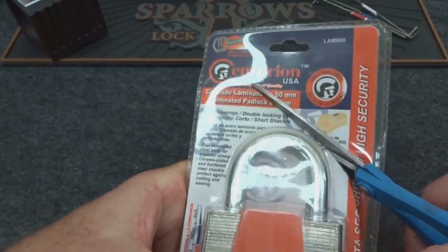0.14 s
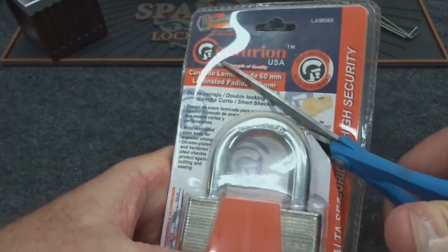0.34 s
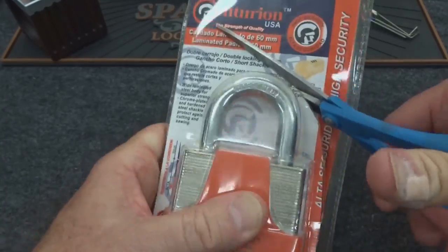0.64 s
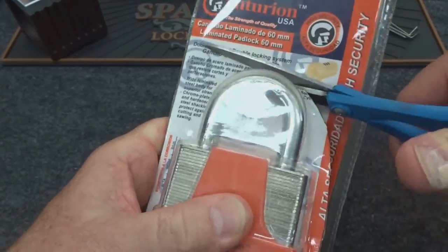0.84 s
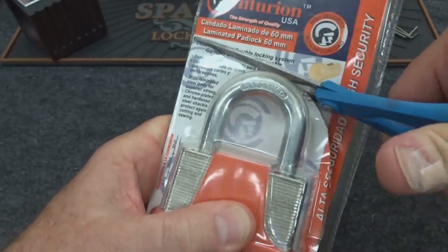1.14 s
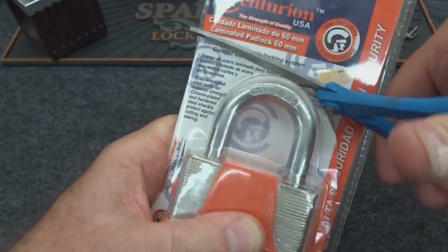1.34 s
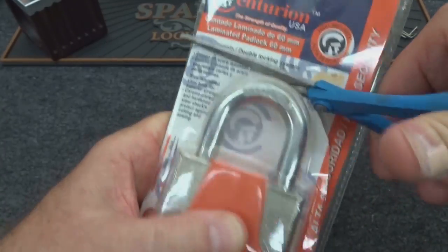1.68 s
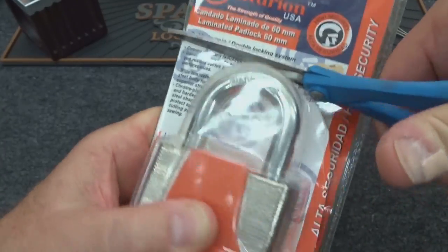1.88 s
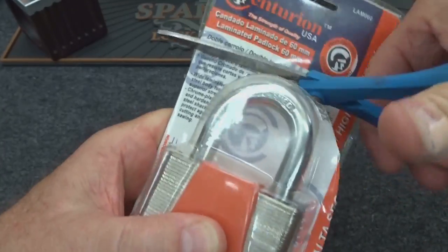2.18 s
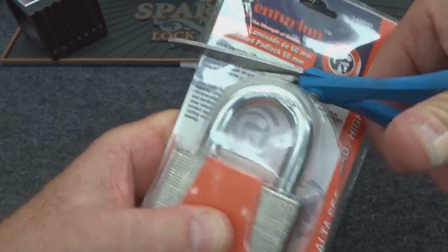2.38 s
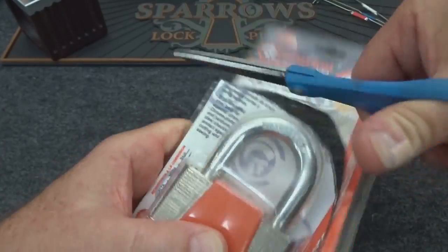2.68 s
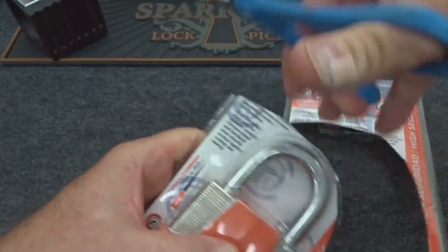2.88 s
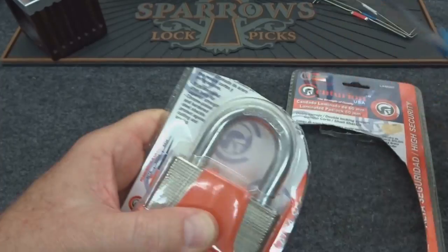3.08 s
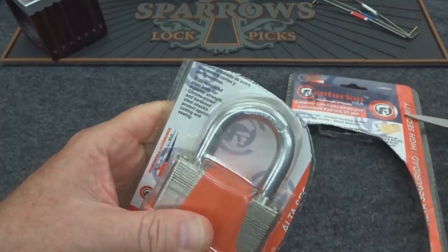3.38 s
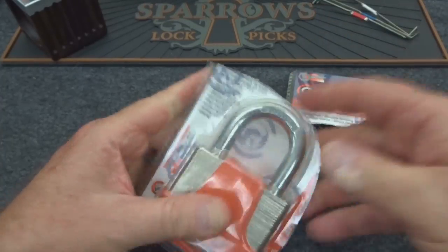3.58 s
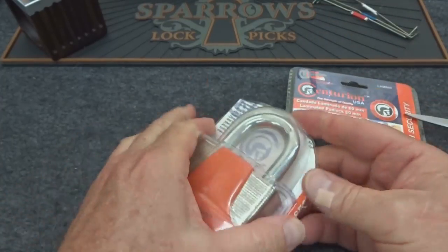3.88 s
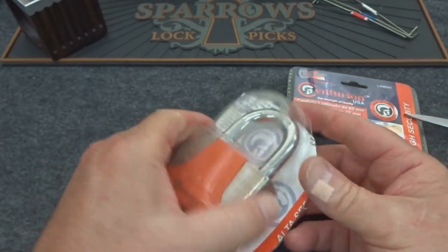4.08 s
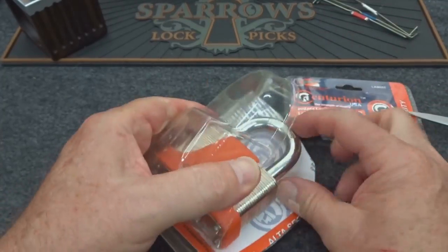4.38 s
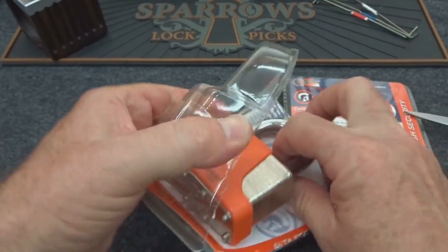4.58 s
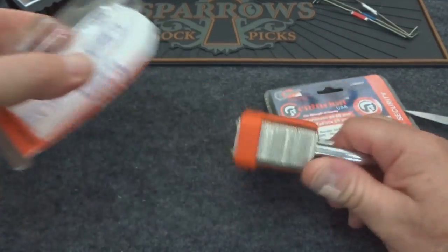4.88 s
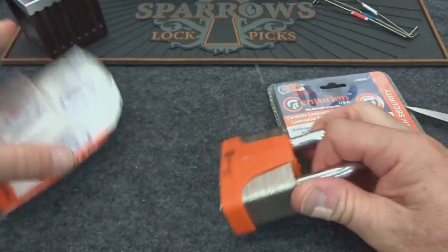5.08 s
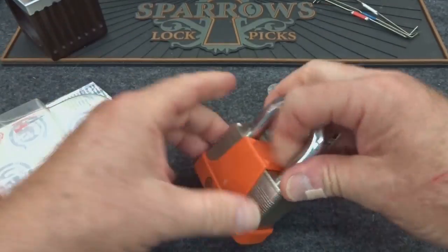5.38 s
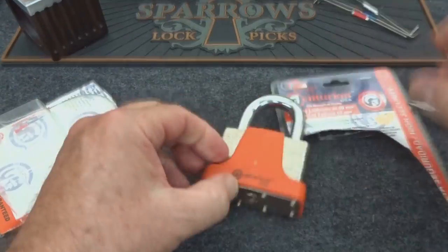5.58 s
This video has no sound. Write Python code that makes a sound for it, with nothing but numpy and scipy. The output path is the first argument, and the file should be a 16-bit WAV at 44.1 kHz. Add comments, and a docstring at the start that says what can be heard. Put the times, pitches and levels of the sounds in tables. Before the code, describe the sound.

A close, dry sound of stiff plastic packaging being cut in a small quiet room. From 0 to 1.8 s, scissors work in uneven bites: bright snaps around 0.1, 0.3, 0.8 and 1.5 s, with scratchy, crinkling rustle swelling and dying between them. A very loud, hard crack bursts at 1.9 s. After a lighter stretch with small snaps, crackling intensifies at 2.6 to 2.8 s as the shell is cut through, with a hollow low pop of card backing near 2.7 s and faint steel ticks. At 3.25 s the scissors land with a short bright metallic clack and soft thud. Quieter handling follows, with a rustle at 3.6 s and gentle crinkles to 4.7 s, then a cluster of small cracks around 4.8 to 5 s and a light bump near 5.2 s. At 5.6 s a heavy padlock hits the padded table with a deep, blunt thump and plastic snaps. Faint low room tone underneath.

```python
"""In a small room, scissors work through a stiff plastic blister pack close to a microphone.
Stick-slip friction rustles as the shell is squeezed; folds give way in cracks that ring its modes.
The card backing pops, scissors, card and a padlock land on a padded table, and the steel blades knock.
The sounds are bursts of force driving damped resonators, over faint room tone and a short diffuse tail."""
import sys
import numpy as np
from scipy import signal
from scipy.fft import rfft, irfft
from scipy.io import wavfile
from scipy.ndimage import uniform_filter1d

SR = 44100
rng = np.random.default_rng(int(sys.argv[2]) if len(sys.argv) > 2 else 0)


def waveform_to_disk(signal):
    """Save audio, clipped to [-1, 1], as 16-bit WAV at the path in sys.argv[1]."""
    frames = np.transpose(np.atleast_2d(signal))
    scaled = np.clip(frames, -1, 1) * 32767
    samples = np.round(scaled).astype(np.int16)
    wavfile.write(sys.argv[1], SR, samples)


N = 252693


def undb(db):
    """Logarithmic level: decibels to amplitude gain."""
    return 10 ** (np.asarray(db) / 20)


def fade(t, t60):
    """Exponential decay: falls 60 dB in t60 seconds."""
    return np.exp(-np.log(1000) * t / t60)


def ring(force, modes, gains, bend=1):
    """Modal superposition: the force drives damped resonators, whose pitches are multiplied by bend."""
    out = 0
    for (hz, db, t60), gain, factor in zip(modes, gains, bend * np.ones(len(modes))):
        radius = fade(1 / SR, t60)
        angle = 2 * np.pi * hz * factor / SR
        poles = [1, -2 * radius * np.cos(angle), radius * radius]
        out = out + gain * undb(db) * signal.lfilter([np.sin(angle)], poles, force)
    return out


def bands(force, peaks, shift_db=0):
    """Broad resonance: heavily damped bands (Hz, width Hz, dB), each raised by shift_db, summed."""
    out = 0
    for k, ((hz, width, db), more) in enumerate(zip(peaks, shift_db + np.zeros(len(peaks)))):
        band = signal.lfilter(*signal.iirpeak(hz, hz / width, fs=SR), force)
        out = out + (-1) ** k * undb(db + more) * band  # neighbours have opposite signs
    return out


def unit(x):
    """Effective value: scale to rms 1."""
    return x / np.sqrt(np.mean(x ** 2))


def peak(x, db):
    """Peak level: scale the largest excursion to db."""
    return x * undb(db) / np.max(np.abs(x))


def add(out, s, x):
    """Linear superposition: mix x into out at time s."""
    i = max(int(s * SR), 0)
    out[i:i + len(x)] += x[:N - i]


def slips(shape, rate, spread_db):
    """Stick-slip friction: random clicks of both signs, rate per second, a few much larger than the rest."""
    hit = rng.random(shape) < rate / SR
    size = np.minimum(rng.exponential(size=shape), 3)
    return hit * rng.standard_normal(shape) * undb(spread_db * size)


def wander(hold):
    """Slow random modulation: levels held for hold samples and slewed from one to the next."""
    steps = np.repeat(rng.standard_normal(N // hold + 1), hold)
    return uniform_filter1d(steps, hold)[:N]


# Spectrum of the room tone. Each row: frequency in Hz, relative level in dB per Hz.
AIR_SPECTRUM = [(21, -22), (35, 7.5), (85, -14), (152, -14), (310, -23), (698, -34), (772, -34.5),
                (1050, -29.5), (1350, -34), (3000, -42.5), (15000, -52)]
AIR_DB = -55.5  # rms level


def air():
    """Spectral shaping of noise: faint room tone, strongest in the bass."""
    hz = np.fft.rfftfreq(N, 1 / SR) + 1  # the offset avoids log(0)
    corner_hz, corner_db = np.array(AIR_SPECTRUM).T
    shape = undb(np.interp(np.log(hz), np.log(corner_hz), corner_db))
    return unit(irfft(rfft(rng.standard_normal(N)) * shape, N)) * undb(AIR_DB)


# Squeezes and scrapes of the pack, each swelling and dying away. Each row: peak time in seconds,
# rustle level in dB, treble in dB over rustle, bass in dB over rustle, pitch in Hz,
# swell in ms per 20 dB, fall in ms per 20 dB, treble tilt in dB from 4 to 13 kHz.
SQUEEZES_OF_PACK = [(0.0, -38.5, -7, -8, 1600, 50, 265, -25), (0.303, -34.5, -10, -7.5, 1480, 150, 240, -6),
                    (0.719, -43.5, -9, -8.5, 1420, 221, 250, -5),
                    (0.818, -32.5, -5.5, -7.5, 1590, 22, 120, -16),
                    (0.9, -47, -28, -18, 1490, 100, 318, -19), (1.153, -38, -11, -8, 1390, 243, 158, -15),
                    (1.339, -42.5, -10, -4.5, 1460, 80, 231, -7),
                    (1.479, -38, -11.5, -20, 1440, 102, 262, -12),
                    (1.702, -40.5, -9.5, -7, 1370, 58, 148.5, -2.5),
                    (1.914, -28, -11, -16, 1520, 82, 215, -19), (2.273, -43, -8, -9, 1580, 181, 230, -2),
                    (2.457, -32, -8, -6.5, 1430, 30, 84, 5), (2.621, -28, -3.5, -25, 2300, 22, 108, 3),
                    (2.696, -26.5, -9, -3.5, 2250, 66, 110, -6), (2.781, -31.5, -6, -8.5, 2600, 96, 134, 0),
                    (2.96, -39.5, -9, -30, 2850, 404, 29, -6), (3.0, -54.5, -7, -4.5, 2150, 63, 299, -9),
                    (3.311, -43.5, -3.5, -5.5, 1880, 63, 121, 1),
                    (3.631, -32.5, -9.5, -8, 1337, 23.5, 126, -10),
                    (3.863, -42.5, -14.5, -11.5, 1250, 96.5, 111, -5.5),
                    (4.035, -51.5, -12.5, -5.5, 1890, 62, 202, -3),
                    (4.149, -38.5, -12.5, -9, 1415, 70, 54, -4.5),
                    (4.26, -49, -7, -10, 1330, 157, 116, -4.5),
                    (4.414, -56.5, -12.5, -17, 1170, 135, 500, -2.5),
                    (4.455, -66, 3.5, -16, 1410, 35.5, 36, 2.5), (4.557, -45.5, -15, -29, 1360, 57, 602, 0),
                    (4.847, -40, -7.5, -10, 1680, 295, 156, 10), (4.917, -44, -9.5, -25, 1530, 100, 90, -6),
                    (5.04, -48.5, -12, -22, 1100, 150, 252, -9), (5.172, -47, -16, -4.5, 998, 65, 282, -11),
                    (5.529, -65.5, 7, -0.5, 1630, 148, 147, -2),
                    (5.602, -30.5, -7.5, -24, 1640, 17, 122, -8)]


def handling():
    """Power addition: squeezes sum in rustle, treble and bass; the louder weigh more in pitch and tilt."""
    s, db, treble_db, bass_db, hz, swell_ms, fall_ms, tilt_db = np.transpose(SQUEEZES_OF_PACK)[:, :, None]
    grid = np.arange(0, N + 64, 64)  # in samples
    ms = (grid / SR - s) * 1000
    power = undb(db + 20 * np.where(ms < 0, ms / swell_ms, -ms / fall_ms)) ** 2
    levels = [10 * np.log10((power * undb(more) ** 2).sum(axis=0)) for more in (0, treble_db, bass_db)]
    means = [(power * c).sum(axis=0) / power.sum(axis=0) for c in (hz, tilt_db)]
    return [np.interp(np.arange(N), grid, c) for c in levels + means]


# Modes of the plastic shell. Each row: frequency in Hz, relative level in dB, decay time t60 in seconds.
SHELL_MODES = [(683, -7.5, 0.018), (820, -7.5, 0.025), (997, -9.5, 0.013), (1170, -7.5, 0.0094),
               (1360, -6.5, 0.012), (1530, 0, 0.01), (1815, -4.5, 0.0079), (2014, 1, 0.011),
               (2286, 2.5, 0.0083), (2564, 0, 0.025), (2800, 5.5, 0.0082), (3454, -6.5, 0.016)]
# Treble colour of the shell. Each row: centre in Hz, width in Hz, relative level in dB.
SHELL_TREBLE = [(3940, 1620, 1), (4300, 3180, 3.5), (5860, 2130, 3.5), (7560, 2140, -4), (8550, 1400, -2.5),
                (10100, 2600, -10), (12700, 3600, -10.5)]


def rustle():
    """Stick-slip excitation of modes: dense slips of fingers and blades on the shell, fluttering in strength."""
    body_db, treble_db, bass_db, pitch_hz, tilt_db = handling()
    flutter = undb(2.8 * wander(256))
    grain = slips(N, 12000, 0.88) + 3.0 * slips(N, 600, 3.4)  # dense grain plus lone ticks
    force = grain * flutter

    body, body_power = 0, 0
    for k, mode in enumerate(SHELL_MODES):
        # the grip decides which modes are free to ring
        free = np.exp(-(np.log(mode[0] / pitch_hz) / 0.42) ** 2)
        free = free + 0.23 * np.minimum(pitch_hz / mode[0], 1) ** 0.6
        free = free * undb(3.5 * wander(2048))  # and they come and go as the shell bends
        body = body + (-1) ** k * free * unit(ring(force, [mode], [1]))
        body_power = body_power + free ** 2

    treble, treble_power = 0, 0
    for k, (centre, width, db) in enumerate(SHELL_TREBLE):
        tilt = tilt_db * k / (len(SHELL_TREBLE) - 1)
        free = np.sqrt(width) * undb(db + tilt + 2.7 * wander(2048))  # each region comes and goes
        own = np.roll(grain, (k + 1) * N // 8) * flutter  # shifted in time, so regions tick separately
        treble = treble + free * unit(bands(own, [(centre, width, 0)]))
        treble_power = treble_power + free ** 2

    bass = unit(bands(bands(force, [(276, 610, 0)]), [(280, 670, 0)]))
    out = body / np.sqrt(body_power) * undb(body_db)
    out = out + treble / np.sqrt(treble_power) * undb(treble_db)
    return out + bass * undb(bass_db)


# Cracks of the shell, with levels before the bass cut. Each row: start in seconds, ring peak in dB,
# ring pitch in Hz, treble peak in dB, nominal length in ms (at least 1 is used).
SHELL_CRACKS = [(0.042, -38, 1550, -45, 4.6), (0.054, -16, 1610, -15.5, 4.1), (0.077, -30.5, 1220, -47, 3),
                (0.098, -9, 1242, -19, 2.2), (0.103, -19, 1430, -23.5, 13.7), (0.231, -37, 820, -34, 2.7),
                (0.247, -35, 1500, -33, 2.7), (0.279, -33, 1040, -30, 3.5), (0.294, -10, 1415, -6.5, 0.73),
                (0.297, -26, 1070, -23.5, 26), (0.359, -26.5, 1460, -31, 3.7),
                (0.385, -24.5, 1020, -23, 14), (0.462, -31, 1170, -24.5, 4.6), (0.482, -38, 674, -37, 17),
                (0.579, -69, 2240, -40.5, 3.9), (0.69, -27, 1270, -38, 1.1), (0.707, -24, 1410, -31, 2.9),
                (0.718, -37, 1580, -12, 3.6), (0.808, -8, 1490, -8.5, 15.7), (0.852, -19, 1530, -25, 28),
                (0.869, -11.5, 1520, -22.5, 10.5), (0.871, -10, 1520, -21, 9.6),
                (0.891, -34, 1590, -34, 42), (0.918, -29.5, 1360, -36, 6.9), (1.042, -8.5, 1570, -25, 4.8),
                (1.115, -27, 656, -54, 4.4), (1.134, -23.5, 775, -54, 3.5), (1.145, -20, 1600, -17, 5),
                (1.153, -21.5, 1390, -17, 8), (1.217, -31.5, 1930, -26.5, 5.5),
                (1.225, -36.5, 600, -26, 14.4), (1.334, -29, 1540, -53, 11), (1.461, -10.5, 1440, -9, 1.6),
                (1.494, -29, 815, -27, 3.4), (1.53, -15.5, 1670, -26, 5.9), (1.664, -33, 1690, -34.5, 7.4),
                (1.681, -30, 1600, -24.5, 2.6), (1.689, -26.5, 950, -36, 2.5), (1.696, -20, 1470, -36, 2.5),
                (1.705, -29, 1500, -35, 2.5), (1.797, -44, 1500, -41, 3), (1.819, -27.5, 1360, -39, 7.5),
                (1.852, -19, 1560, -22, 2.3), (1.864, -11, 1620, -4, 1.7), (1.88, -14, 1510, -9, 1.2),
                (1.896, 3, 1673, -6, 3.9), (1.903, -12, 1690, -8.5, 25), (1.921, -37, 1280, -11.5, 3.1),
                (1.925, -7, 1520, -18, 5.3), (1.933, -42, 1308, -34, 24), (1.952, -13.5, 1840, -26, 2.4),
                (1.982, -39, 1780, -36, 54), (2.047, -28, 840, -54, 8.7), (2.104, -45, 2190, -25.5, 1.6),
                (2.209, -23.5, 1110, -33, 5.2), (2.224, -25, 2080, -25.5, 2.6),
                (2.262, -14.5, 1460, -5, 2.3), (2.334, -24, 615, -30, 19.5), (2.358, -21, 3350, -9.5, 2.1),
                (2.467, -25.5, 1590, -46, 14), (2.512, -31, 1560, -43, 7.6), (2.535, -33, 2780, -32.5, 2.1),
                (2.602, -12, 1550, -10.5, 3), (2.615, -2.5, 1795, -9.5, 2.1), (2.62, -16.5, 610, -26, 8.8),
                (2.646, -22, 2800, -19, 4.6), (2.68, -11.5, 1800, -12.5, 7.3),
                (2.689, -1.5, 1416, -5.5, 7.9), (2.729, -23, 1620, -19, 4.1), (2.774, -26, 2140, -23.5, 12),
                (2.796, -14.5, 2120, -18.5, 10), (2.835, -28.5, 3050, -36, 7.4),
                (2.897, -30.5, 2220, -43, 6.5), (2.904, -28, 2130, -36, 5.9), (2.951, -30, 2930, -29, 7.8),
                (3.053, -42.5, 1660, -55.5, 5), (3.077, -45, 950, -50, 3.6), (3.118, -47, 2910, -39.5, 4.2),
                (3.166, -70.5, 2460, -40, 1.5), (3.21, -54, 1230, -42.5, 2.5), (3.236, -36, 605, -30, 3.2),
                (3.25, -27.5, 1610, -14.5, 1.6), (3.296, -28, 2120, -25, 4.3),
                (3.375, -51, 1800, -33.5, 3.7), (3.628, -33, 1670, -30, 12.5), (3.674, -34, 1400, -47, 10),
                (3.692, -32, 1650, -32.5, 7.3), (3.845, -34.5, 2390, -42, 6.9), (3.869, -36, 913, -38, 9.3),
                (4.032, -35, 2420, -36, 7.3), (4.081, -34, 1300, -45, 4.5), (4.092, -40, 1760, -41.5, 9.6),
                (4.142, -23, 1590, -24.5, 6.3), (4.249, -47, 2020, -35.5, 4),
                (4.257, -38.5, 2050, -33.5, 4.2), (4.401, -21, 1360, -52.5, 4.6),
                (4.49, -41, 693, -65, 4.2), (4.534, -28, 1324, -53, 3.2), (4.55, -35, 1350, -39, 4.4),
                (4.559, -30.5, 1310, -55, 11), (4.64, -35, 1300, -40, 5.8), (4.662, -23.5, 1330, -26, 6),
                (4.67, -43, 1460, -25.5, 2.2), (4.748, -31.5, 676, -47, 2.3), (4.83, -27, 1170, -23, 3.9),
                (4.839, -28.5, 2670, -34, 14), (4.854, -27.5, 2700, -44, 3.4), (4.863, -24, 2210, -26, 1.8),
                (4.878, -21.5, 1160, -45, 1.4), (4.921, -32, 1860, -33, 4.2), (4.951, -35, 2110, -37, 2.5),
                (4.964, -21.5, 1530, -23, 1), (4.976, -17, 1395, -20, 4.8), (4.984, -19.5, 1110, -33, 0.86),
                (5.156, -27, 830, -39.5, 12), (5.174, -15, 946, -33.5, 1.7), (5.184, -30, 855, -39.5, 3.4),
                (5.437, -67.5, 2640, -37, 10), (5.516, -37.5, 1310, -39.5, 22),
                (5.597, -18.5, 715, -20.5, 1.8), (5.598, -14, 1930, -19, 6.7), (5.625, -33, 2900, -42, 12),
                (5.652, -12, 1830, -19.5, 2.4), (5.661, -32, 2580, -27, 10)]
SHELL_LOW_HZ = 443


def cracks():
    """Buckling: each fold gives way in a short run of slips that rings nearby modes and snaps in the treble."""
    out, t = np.zeros(N), np.arange(3000) / SR
    first = np.arange(len(t)) == 40  # one sharp click early in the run
    runs = slips((len(SHELL_CRACKS), len(t)), 15000, 3.1)
    chances = rng.standard_normal((len(SHELL_CRACKS), len(SHELL_MODES)))
    mode_hz = np.array(SHELL_MODES)[:, 0]
    regions = len(SHELL_TREBLE)
    for (s, db, hz, treble_db, ms), run, chance in zip(SHELL_CRACKS, runs, chances):
        length = max(ms, 1) / 1000
        rise = 1 - fade(t, 0.0011 + 0.67 * length)  # long runs build up more slowly
        fall = np.exp(-(t / (0.87 * length)) ** 1.46) + 0.091 * fade(t, 0.11)
        force = run * rise * fall

        near = np.exp(-(np.log(mode_hz / hz) / 0.11) ** 2)  # the fold favours its own pitch
        near = near + 0.35 * np.minimum(hz / mode_hz, (mode_hz / hz) ** 0.23) ** 2
        body = ring(force, SHELL_MODES, np.sign(chance) * near, 1 + 0.023 * chance)  # bending detunes it
        body = body + 0.63 * bands(force, [(hz, 0.36 * hz, 0)])  # many heavily damped modes blur together
        # the ring is dulled above a few times its pitch
        body = signal.lfilter(*signal.butter(2, min(2.7 * hz, 6000), fs=SR), body)

        # short runs are brighter, and every fold has its own treble colour
        tilt_db = (2.0 - 0.37 * ms) * np.linspace(-1, 1, regions) + 1.8 * chance[:regions]
        shifted = np.array(SHELL_TREBLE) * (1 + 0.048 * np.outer(chance[-regions:], [1, 0, 0]))
        snap = bands(force + first * 0.8 * np.max(force), shifted, tilt_db)
        add(out, s, peak(body, db) + peak(snap, treble_db))
    # the cracks carry little deep bass
    return signal.sosfilt(signal.butter(3, SHELL_LOW_HZ, "high", fs=SR, output="sos"), out)


# Low pops of the card backing as it buckles. Each row: start in seconds, peak level in dB.
CARD_POPS = [(0.295, -27.5), (0.386, -30), (0.869, -48), (0.919, -21.5), (1.042, -33.5), (1.115, -32),
             (1.134, -23), (1.53, -26.5), (1.896, -32), (2.335, -27.5), (2.358, -25), (2.449, -26),
             (2.514, -34.5), (2.601, -28), (2.613, -37), (2.688, -8.5), (2.794, -24), (3.631, -28),
             (4.829, -32), (4.877, -32.5), (5.161, -25.5), (5.188, -27), (5.597, -19.5), (5.643, -29),
             (5.681, -30)]
# Modes of the card. Each row: frequency in Hz, relative level in dB, decay time t60 in seconds;
# chance varies pitch and level from pop to pop.
CARD_MODES = [(280, -4, 0.073), (400, -6, 0.02), (433, 3.5, 0.023), (590, -7.5, 0.051)]


def pops():
    """Snap-through instability: the card flips over and rings low for a moment."""
    out, t = np.zeros(N), np.arange(3000) / SR
    push = np.gradient(np.exp(-((t - .001) / 0.00066) ** 2))
    chances = rng.standard_normal((len(CARD_POPS), len(CARD_MODES)))
    for (s, db), chance in zip(CARD_POPS, chances):
        sound = ring(push, CARD_MODES, 1 + 0.13 * chance, 1 + 0.1 * chance)
        add(out, s, peak(sound, db))
    return out


# Things landing on the table. Each row: start in seconds, peak level in dB, contact time in ms.
LANDINGS = [(1.227, -35, 5.9), (1.966, -42.5, 20), (2.617, -36, 10.5), (2.687, -25, 8.9), (2.8, -26, 7.1),
            (2.898, -33, 9.7), (3.234, -25.5, 6.9), (3.248, -20, 7.4), (3.296, -33, 9), (3.635, -38, 8.4),
            (3.699, -43.5, 10), (4.785, -38.5, 10), (4.884, -32.5, 11.7), (5.171, -27.5, 5.5),
            (5.424, -43, 20), (5.479, -44, 21), (5.596, -0.5, 8.1)]
# Modes of the table. Each row: frequency in Hz, relative level in dB, decay time t60 in seconds.
TABLE_MODES = [(65.7, 1, 0.14), (83.7, -5, 0.22), (126, -0.5, 0.15), (158, -14, 0.11), (196, -17, 0.16),
               (267, -10.5, .12), (377, -18, 0.1), (436, -21, 0.11)]


def thuds():
    """Impact on a compliant surface: a soft push on the padded top, which springs back, rings the table."""
    out, t = np.zeros(N), np.arange(16384) / SR
    for s, db, ms in LANDINGS:
        phase = np.clip(t / (max(ms, 1) / 1000), 0, 1)
        push = np.gradient(np.sin(np.pi * phase) ** 4)
        direct = np.gradient(push) * 35000.0
        sound = direct - ring(push * 25.0, TABLE_MODES, np.ones(len(TABLE_MODES)))
        add(out, s, peak(sound, db))
    return out


# Knocks of the steel blades as they shut and land. Each row: start in seconds, peak level in dB.
BLADE_KNOCKS = [(2.618, -32), (2.645, -33), (2.796, -36), (2.84, -39), (2.872, -42), (2.925, -42),
                (2.952, -41), (3.237, -38), (3.249, -13), (3.296, -38)]
# Modes of the free steel. Each row: frequency in Hz, relative level in dB, decay time t60 in seconds.
STEEL_MODES = [(5120, -3, .012), (6460, -4, .08), (8600, -6, .1), (9510, 2, .012), (11450, -9, .12),
               (12200, 0, .015), (13300, -3, .015), (15200, -14, .07)]
PUT_DOWN_S, LYING_RING = 3.1, .45  # from this time, on the padding, steel rings for this share of its t60


def blades():
    """Modal ringing of a struck bar: each knock is a brief rattle at the pivot that rings the steel."""
    out, t = np.zeros(N), np.arange(8192) / SR
    noises = rng.standard_normal((len(BLADE_KNOCKS), len(t)))
    for (s, db), noise in zip(BLADE_KNOCKS, noises):
        modes = np.array(STEEL_MODES) * [1, 1, 1 if s < PUT_DOWN_S else LYING_RING]
        rattle = noise * fade(t, .015)
        add(out, s, peak(ring(rattle, modes, np.ones(len(modes))), db))
    return out


ROOM_DB, ROOM_T60_S, ROOM_TOP_HZ = -17, 0.18, 6000


def room(near):
    """Diffuse reverberation: convolution with decaying noise, dulled in the treble."""
    t = np.arange(SR // 3) / SR
    tail = rng.standard_normal(len(t)) * fade(t, ROOM_T60_S) * (1 - fade(t, 0.0031))
    tail = signal.lfilter(*signal.butter(1, ROOM_TOP_HZ, fs=SR), tail)
    tail = tail / np.sqrt(np.sum(tail ** 2))  # unit energy
    return undb(ROOM_DB) * signal.fftconvolve(near, tail)[:N]


def scene():
    """Superposition: close sources, with a room tail on the cracks, pops and blades."""
    near = cracks() + pops() + blades()
    return (near + room(near) + rustle() + thuds() + air())[None]


MIC_LOW_HZ, TOP_HZ = 39, 15950


def record(dry):
    """Band limiting and overload: the microphone rolls off deep bass; the recorder clips, then cuts the top."""
    mic = signal.lfilter(*signal.butter(1, MIC_LOW_HZ, "high", fs=SR), dry)
    clipped = np.clip(mic, -1, 1)
    return signal.sosfilt(signal.ellip(12, .5, 115, TOP_HZ, fs=SR, output="sos"), clipped)


dry = scene()
out = record(dry)
waveform_to_disk(out)
```